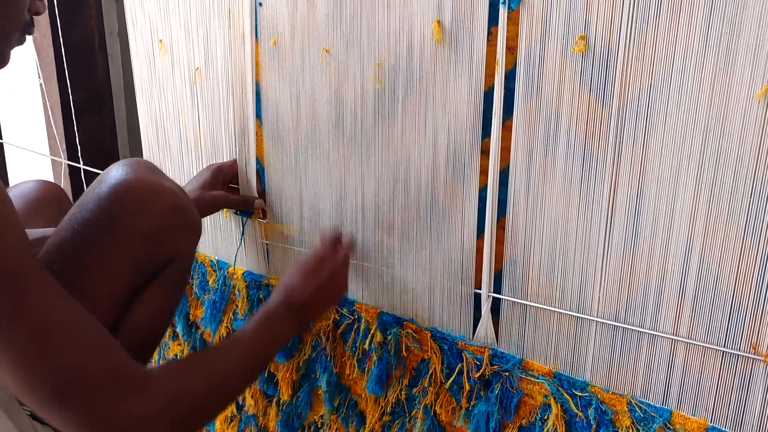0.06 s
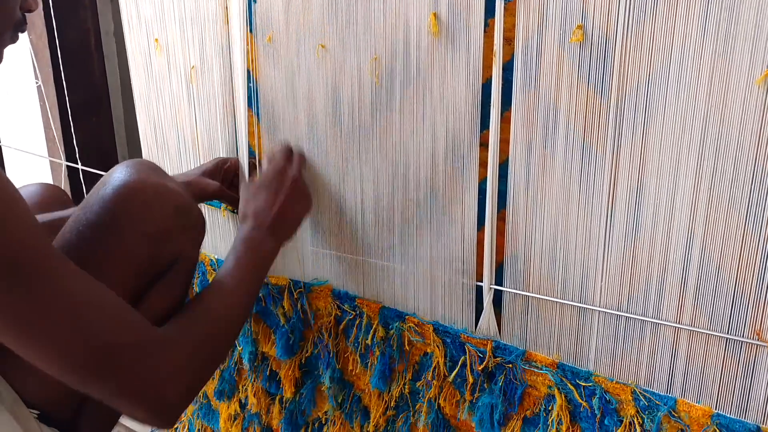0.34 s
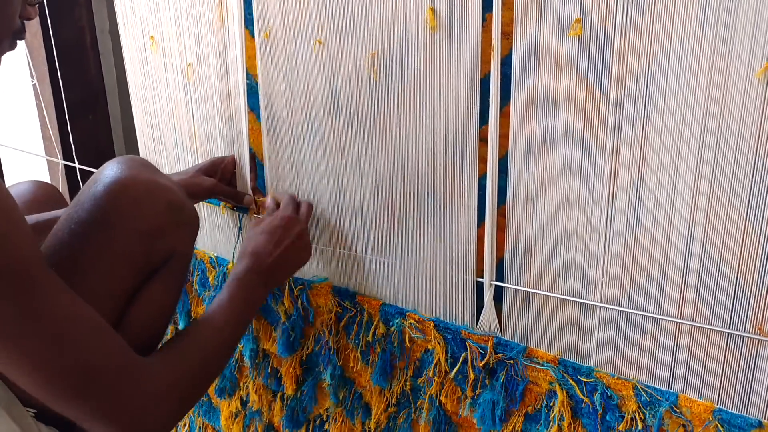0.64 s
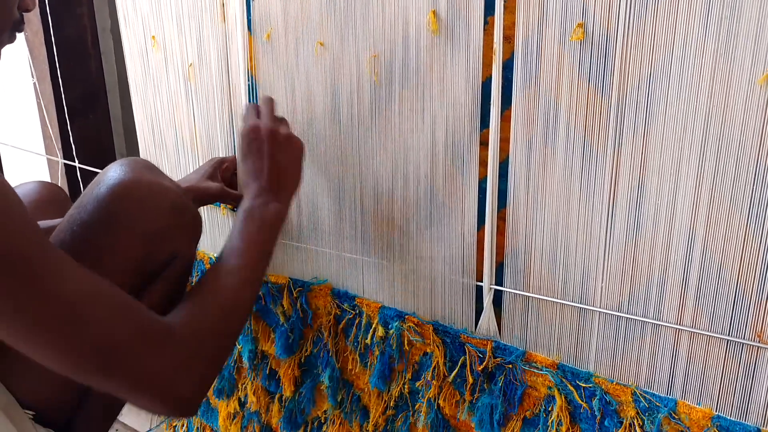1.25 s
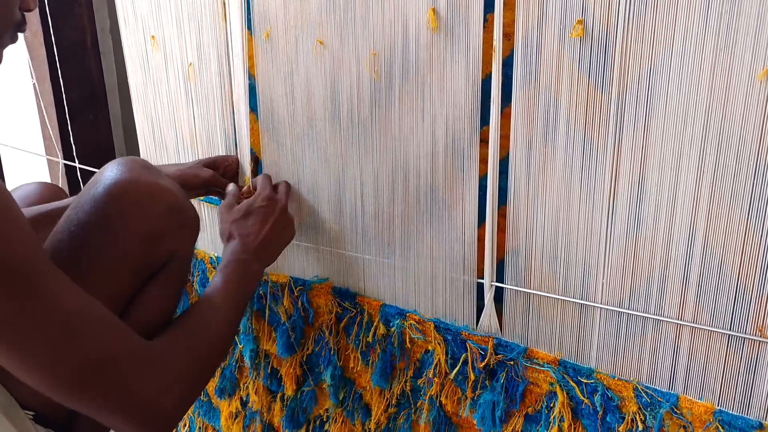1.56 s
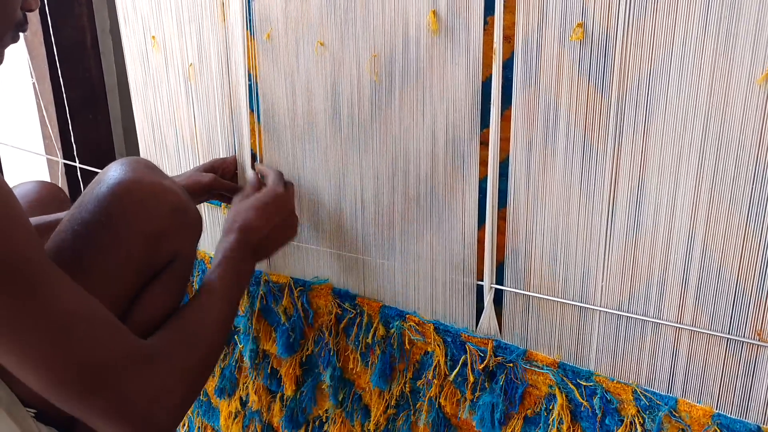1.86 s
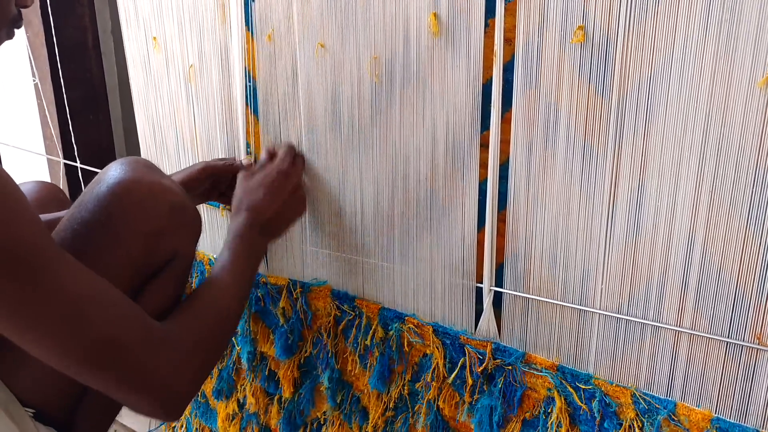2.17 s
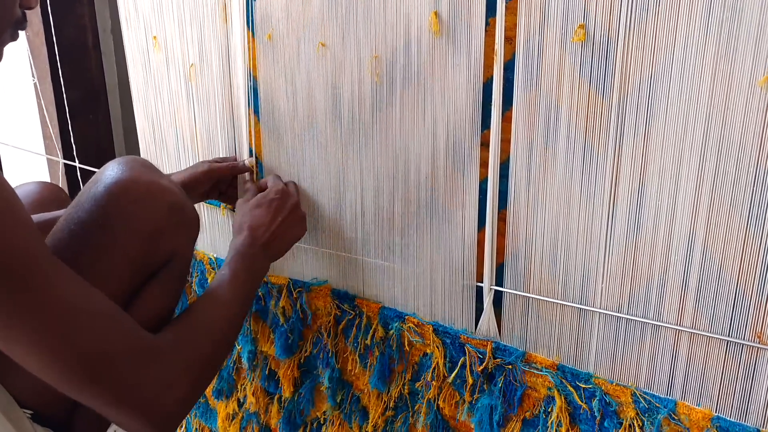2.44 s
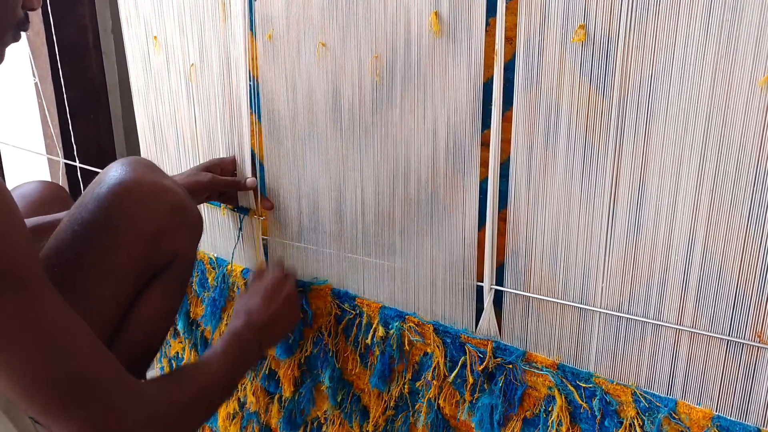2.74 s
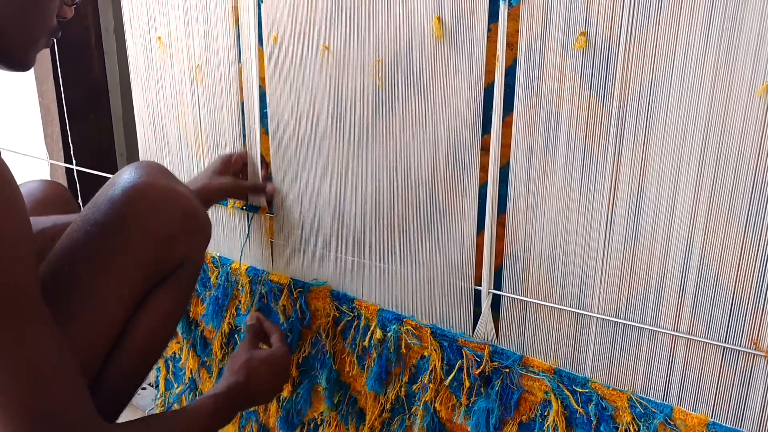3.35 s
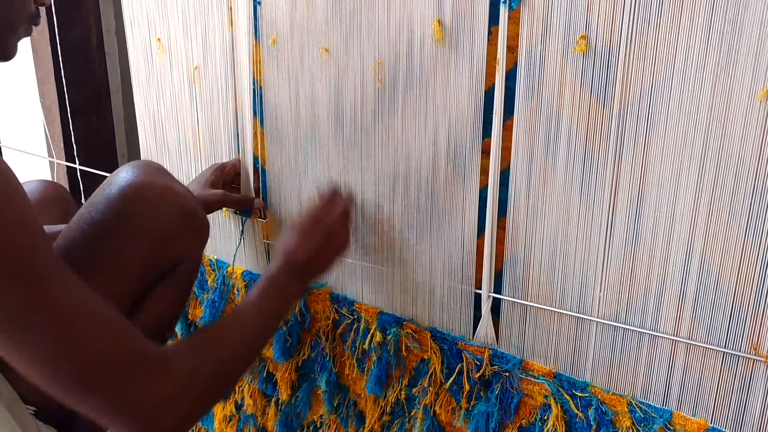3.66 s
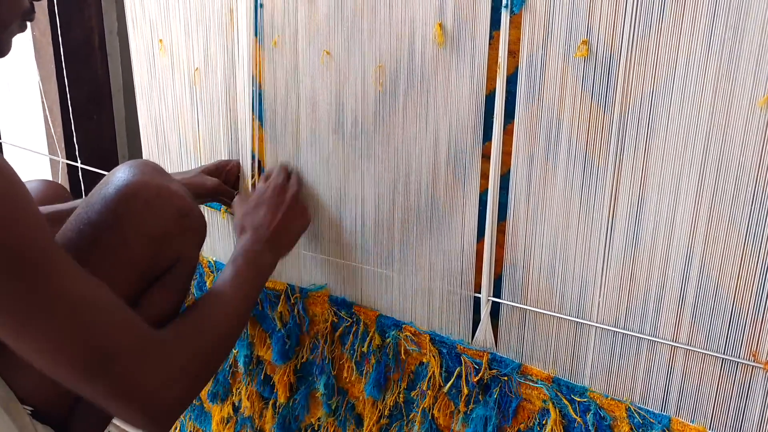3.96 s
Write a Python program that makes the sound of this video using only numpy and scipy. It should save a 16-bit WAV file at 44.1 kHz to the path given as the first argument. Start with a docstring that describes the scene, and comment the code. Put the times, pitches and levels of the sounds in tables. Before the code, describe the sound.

Hand weaving on a carpet loom, with steady low thuds, swishes and humming threads.

```python
"""A bare, quiet room where someone weaves by hand at an upright carpet loom.
About two and a half times a second, with one pause, the hand plucks the warp (the tight upright threads)
with a soft thud that knocks the frame, then rakes across it in a swelling swish; the warp hums on.
Between strokes, yarn rubs and slides and fingers rustle.
Two close microphones hear it all, and their stereo sound is widened."""
import sys
import numpy as np
from scipy import signal
from scipy.fft import rfft, irfft
from scipy.io import wavfile

SR = 44100
rng = np.random.default_rng(int(sys.argv[2]) if len(sys.argv) > 2 else 0)


def int16_out(signal):
    """Quantize to a 16-bit WAV file."""
    q = np.round(np.clip(np.atleast_2d(signal).T, -1, 1) * 32767)
    wavfile.write(sys.argv[1], SR, q.astype(np.int16))


N = 176400
LEAD = 8820  # extra samples before time zero, so a stroke can already be sounding
TIME = (np.arange(N + LEAD) - LEAD) / SR
FREQ = np.fft.rfftfreq(len(TIME), 1 / SR)

# Hand strokes: t/s, thud level/dB, hum level/dB, hum tilt/dB per octave, swish level/dB,
# swish peak delay/s, swish rise/s, fingertip catch level/dB
STROKES = [(-0.02, -27, -22.5, -5.5, -30.5, 0.11, 0.026, -32.5),
           (0.366, -28.5, -22.5, -6, -32.5, 0.11, 0.14, -35.5),
           (0.743, -25, -21.5, -11, -27.5, 0.089, 0.015, -33.5),
           (1.125, -27.5, -21.5, -3.5, -30.5, 0.1, 0.037, -54),
           (1.845, -23, -22.5, -10, -27, 0.12, 0.037, -32),
           (2.283, -25, -22.5, -1, -26.5, 0.11, 0.025, -35.5), (2.683, -24, -24, 0, -25, 0.11, 0.04, -32.5),
           (3.085, -28, -22, -1, -26, 0.11, 0.036, -64), (3.488, -26, -24.5, 0, -27.5, 0.11, 0.047, -56),
           (3.854, -23.5, -26, 0.5, -26.5, .1, 0.019, -39)]


def thuds(attack_s=0.016, decay_s=0.11):
    """Fingers grip a bunch of threads and let it snap free; each pluck stirs the room differently."""
    # Tone of the thud: f/Hz, level/dB
    spectrum = [(30, -40), (60, -12), (110, -8), (185, 1), (270, -1), (440, 0), (600, -4), (900, -3.5),
                (1500, -16), (3200, -16), (5000, -34.5), (8000, -45), (15000, -51)]
    snaps = colour(thread_clicks(per_second=2000), spectrum)
    out = 0
    for start, db, *_ in STROKES:
        grip = undb(-10) * hump(start, half_s=0.0073)  # a brush just before the pull
        pluck = burst(start, attack_s, decay_s)
        out = out + undb(db) * room((grip + pluck) * snaps, wet_db=-5)
    return out


def frame_knocks(rise_s=0.0043, overtone_ratio=2.225, rebound_s=0.01946, rebound_db=-3):
    """The tugged warp jolts the frame with a short, low knock and a rebound."""
    # Knocks: t/s, level/dB, overtone relative to the low note/dB, f/Hz
    knocks = [(0.009, -21, -15, 143), (0.377, -18, -18, 167), (0.750, -18.5, -2.5, 163),
              (0.821, -22, -8, 171), (1.15, -23, -17, 142), (1.856, -16.5, -1.5, 165.4),
              (1.913, -18.5, -13, 145), (2.292, -17.5, -7, 163), (2.346, -22, -5, 171),
              (2.696, -14.5, -3.5, 177), (2.768, -22, -7, 162), (3.092, -14.5, -8.5, 158),
              (3.497, -16.5, -9, 175), (3.866, -18.5, -11.5, 170)]
    out = np.zeros((2, len(TIME)))
    t = np.arange(SR // 10) / SR
    swell = t / rise_s * np.exp(1 - t / rise_s)
    for start, db, overtone_db, hz in knocks:
        for delay, drop_db in ((0, 0), (rebound_s, rebound_db)):
            low_phase, high_phase = 2 * np.pi * rng.random((2, 2, 1))
            angle = 2 * np.pi * hz * t
            overtone = undb(overtone_db) * np.sin(overtone_ratio * angle + high_phase)
            at = int((start + delay) * SR) + LEAD
            out[:, at:at + len(t)] += undb(db + drop_db) * swell * (np.sin(angle + low_phase) + overtone)
    return room(out, wet_db=-6)


def fingertip_catches(delay_s=0.0039, attack_s=0.0046, decay_s=0.033):
    """Fingertips catch on the threads with a short rasp as each stroke begins."""
    # Tone of the rasp: f/Hz, level/dB
    spectrum = [(500, -25), (1500, -17), (2900, 7), (3600, -1.5), (4500, -3), (7000, -21), (15000, -45)]
    catch = sum(undb(db) * burst(start + delay_s, attack_s, decay_s) for start, *_, db in STROKES)
    return room(colour(catch * thread_clicks(per_second=3000), spectrum), wet_db=-5)


def warp_hum(threads=4, detune=0.02004, attack_s=0.0044, pivot_hz=180):
    """Each stroke sets groups of slightly out-of-tune threads ringing."""
    # Natural notes of the warp and frame: f/Hz, level/dB, time to fade by 60 dB/s
    notes = [(76, -24, 0.6), (100.6, -8, 1.3), (122.2, -7, 0.61), (142.1, -1, 1.63), (160, -13.5, 1.3),
             (172, -1.5, 0.33), (220.4, -0.5, 0.5), (348.5, -10.5, 2.8), (455, 0, 1.26), (628, -10, 1.4),
             (837, -5.5, 1.73), (1435, -28, 0.59)]
    t = np.arange(SR) / SR
    out = np.zeros((2, len(TIME) + SR))
    strength = np.sqrt(threads * sum(undb(db) ** 2 for _, db, _ in notes) / 2)
    for start, _, hum_db, tilt_db, *_ in STROKES:
        ring = 0
        for hz, db, fade_s in notes:
            pitch = hz * (1 + detune * rng.standard_normal((2, threads, 1)))
            cycles = pitch * t + rng.random((2, threads, 1))
            gain = undb(db + tilt_db * np.log2(hz / pivot_hz))
            ring = ring + gain * undb(-60 * t / fade_s) * np.sin(2 * np.pi * cycles).sum(axis=1)
        at = max(int(start * SR) + LEAD, 0)
        out[:, at:at + SR] += undb(hum_db) * ring * (1 - np.exp(-t / attack_s)) / strength
    return out[:, :len(TIME)]


def swishes(onset_s=0.044, fall_s=0.023, drag_s=0.069, bright_db=2, bright_hz=7000):
    """The hand rakes the warp, faster and brighter until it leaves the threads; single fibres crackle."""
    # Tone of the swish: f/Hz, level/dB
    swish_spectrum = [(40, -28), (120, 1), (220, -0.5), (500, -4.5), (1000, -6.5), (2000, -11), (3500, -11),
                      (6000, -17.5), (8500, -24), (11000, -31), (13000, -45), (15000, -48)]
    # Narrow resonances of the raked threads: f/Hz, width/Hz, level/dB
    resonances = [(3150, 36, 0), (3320, 31, -5), (6400, 90, -0.5), (6270, 38, 5)]
    # Tone of the crackle: f/Hz, level/dB
    fibre_spectrum = [(3000, -30), (7000, -4), (11000, 0), (13000, -7), (15000, -10)]
    crest = drag = 0
    for start, *_, db, peak_s, rise_s, _ in STROKES:
        past_peak = TIME - start - peak_s
        touch = undb(db) * np.clip((TIME - start) / onset_s, 0, 1)
        crest = crest + touch * np.exp(-np.abs(past_peak) / np.where(past_peak < 0, rise_s, fall_s))
        drag = drag + touch * 0.39 * np.exp(-np.maximum(past_peak, 0) / drag_s)
    slips = thread_clicks(per_second=3000)
    treble = undb(bright_db * FREQ ** 2 / (FREQ ** 2 + bright_hz ** 2))
    raking = treble * rfft(crest * slips) + rfft(drag * slips)
    rasp = irfft(raking * resonance_gain(resonances), len(TIME))
    crackle = undb(-26) * colour(crest * thread_clicks(per_second=260), fibre_spectrum)
    return room(colour(rasp, swish_spectrum), wet_db=-1) + room(crackle, wet_db=-12)


def yarn_rubs():
    """Yarn rubs with a soft, low scuff between strokes."""
    # Rubs: middle t/s, half length/s, level/dB
    rubs = [(0.246, 0.25, -36.5), (0.528, 0.048, -34), (0.834, 0.02, -35), (1.285, 0.11, -33.5),
            (2.094, 0.21, -33), (2.504, 0.17, -34), (2.887, 0.064, -28), (3.032, 0.061, -32),
            (3.3, 0.13, -32), (3.665, 0.049, -30)]
    # Tone of the rubbing: f/Hz, level/dB
    spectrum = [(50, -37), (150, 4.5), (450, 3), (800, -3), (1600, -7), (2300, -11.5), (4000, -19),
                (7000, -28), (15000, -50)]
    return friction(rubs, spectrum, per_second=1400, wet_db=0.5)


def yarn_slides():
    """Yarn hisses as it slides through the warp."""
    # Slides: middle t/s, half length/s, level/dB
    slides = [(0.12, 0.14, -42.5), (0.31, 0.073, -38), (1.06, 0.17, -39.5), (1.83, 0.048, -40.5),
              (2.18, 0.15, -40.5), (2.96, 0.17, -35.5)]
    # Tone of the sliding: f/Hz, level/dB
    spectrum = [(500, -40), (1100, -7.5), (1500, -1.5), (1900, -1.5), (2400, -16), (3500, -40), (7000, -34),
                (15000, -55)]
    return friction(slides, spectrum, per_second=1500, wet_db=-1)


def finger_rustles():
    """Fingers pick at the warp with a light rustle."""
    # Rustles: middle t/s, half length/s, level/dB
    rustles = [(0.22, 0.034, -47), (0.71, 0.02, -42), (1.33, 0.048, -54), (1.64, 0.073, -48),
               (1.77, 0.05, -51), (2.2, 0.055, -47.5), (3.76, 0.025, -43.5)]
    # Tone of the picking: f/Hz, level/dB
    spectrum = [(300, -25), (1000, -12), (1700, 4), (3800, 1.5), (5500, -13), (9000, -10), (12000, -14),
                (15000, -20)]
    return friction(rustles, spectrum, per_second=500, wet_db=4.5)


def ticks(decay_s=0.0013):
    """Tiny bright ticks, too close to the microphones to stir the room."""
    # Ticks: t/s, level/dB
    events = [(3.873, -37), (3.877, -37)]
    loudness = sum(undb(db) * burst(start, decay_s / 2, decay_s) for start, db in events)
    return loudness * rng.standard_normal((2, len(TIME)))


def room_tone(level_db=-31, points=40):
    """The low, gently wavering background of the workroom."""
    # Tone of the background: f/Hz, level/dB
    spectrum = [(25, -23), (50, -17.5), (75, 2), (110, 4.5), (150, 0.5), (250, -6.5), (450, -10.5),
                (1000, -17.5), (2000, -23), (4000, -26), (6000, -35.5), (8000, -42), (11000, -44.5),
                (15000, -62)]
    waver_db = np.interp(TIME, np.linspace(TIME[0], TIME[-1], points), rng.standard_normal(points))
    return undb(level_db + waver_db) * colour(rng.standard_normal((2, len(TIME))), spectrum)


def room(x, wet_db, build_s=0.00047):
    """Add the room's echo, whose treble dies first; wet_db is its level against the direct sound."""
    # Length of the echo: f/Hz, time to fade by 60 dB/s
    fade_times = [(100, 1), (500, 0.99), (2000, 1), (5000, 0.76), (12000, 0.45)]
    hz, t, noise = signal.stft(rng.standard_normal((2, SR)), SR, nperseg=256)
    fade_s = look_up(hz, fade_times)[:, None]
    tail = signal.istft(noise * undb(-60 * t / fade_s), SR)[1]
    tail *= np.clip(np.arange(tail.shape[1]) / SR / build_s, 0, 1)
    tail *= undb(wet_db) / np.sqrt(np.sum(tail ** 2, axis=1, keepdims=True))
    echo = signal.fftconvolve(x, tail, axes=1)[:, :len(TIME)]
    return (x + echo) / np.sqrt(1 + undb(wet_db) ** 2)


def friction(moves, spectrum, per_second, wet_db):
    """Many tiny slips blend into a brushing sound that swells and fades with each move."""
    pull = sum(undb(db) * hump(middle, half_s) for middle, half_s, db in moves)
    return room(colour(pull * thread_clicks(per_second), spectrum), wet_db)


def thread_clicks(per_second, spread_db=3):
    """Threads slip one by one: random clicks of uneven size in two channels, with average power 1."""
    shape = (2, len(TIME))
    slips = rng.random(shape) < per_second / SR
    clicks = slips * np.sign(rng.standard_normal(shape))
    clicks *= undb(spread_db * rng.standard_normal(shape))
    return clicks / clicks.std()


def burst(start, attack_s, decay_s):
    """A loudness curve that rises in a straight line, then dies away."""
    age = TIME - start
    return np.clip(age / attack_s, 0, 1) * np.exp(-np.maximum(age - attack_s, 0) / decay_s)


def hump(middle, half_s):
    """A smooth, bell-shaped loudness curve."""
    return np.exp(-((TIME - middle) / half_s) ** 2)


def colour(x, spectrum):
    """Give a sound its tone; white noise keeps its overall power."""
    gain = undb(look_up(FREQ, spectrum))
    return irfft(rfft(x) * gain / np.sqrt(np.mean(gain ** 2)), len(TIME))


def resonance_gain(table):
    """Gain at each frequency for a few narrow peaks and dips."""
    return undb(sum(db * np.exp(-((FREQ - hz) / width) ** 2) for hz, width, db in table))


def look_up(hz, table, column=1):
    """Read between a table's rows, giving every octave equal space."""
    rows = np.array(table, float)
    return np.interp(np.log(np.maximum(hz, 1)), np.log(rows[:, 0]), rows[:, column])


def undb(db):
    """Turn decibels into a multiplier."""
    return 10 ** (np.asarray(db) / 20)


def scene():
    """Loom and room in two channels that share their timing but each have their own noise."""
    strokes = thuds() + frame_knocks() + fingertip_catches() + warp_hum() + swishes()
    return (strokes + yarn_rubs() + yarn_slides() + finger_rustles() + ticks() + room_tone())[:, LEAD:]


def record(dry, notch_shape=1.3, top_hz=15500):
    """The microphones colour the sound; the stereo is widened and the highest treble is cut."""
    # Resonances of the microphone openings: f/Hz, width/Hz, level/dB
    ports = [(1890, 84, 2), (2442, 113, -18), (2600, 28, 11), (4736, 110, 8), (7740, 290, 6)]
    # Notches where side (left minus right) and mid (their sum) cancel by turns: f/Hz, leak level/dB
    notches = [(1250, -25), (2425, -90), (3700, -8), (5000, -8.5), (6300, -2.5), (7600, -15), (8920, -42),
               (9980, -42), (11250, -30), (12500, -18), (13800, 2), (15200, -11)]
    # Stereo spread: f/Hz, side level/dB, likeness of side and mid/0-1, side phase lead/rad
    image = [(45, -17, 0.9, 2.1), (115, -14.5, 0.87, 1.13), (185, -16.5, 0.92, 0.86),
             (277, -13, 0.78, 0.84), (450, -9.5, 1, 0.79), (785, -2, 0.62, 0.65), (1310, 3.5, 0.3, 1.3),
             (2060, -2.5, 0.06, -0.077), (3170, 1.5, .45, -1.6), (4320, -4, 0, -1.5), (4600, 3, 0.27, 1.2),
             (5570, -2, 0.7, -1.4), (6660, -1, 0.5, 1.1), (8900, -8, 0.65, -1.6), (9700, 7.5, 0, 1),
             (12500, -3, 0.5, 0.14)]
    mid, unrelated = rfft(dry, len(TIME)) * resonance_gain(ports)
    angle = np.pi / 2 * np.interp(FREQ, [0] + [hz for hz, _ in notches], np.arange(len(notches) + 1))
    leak = undb(look_up(FREQ, notches))
    side_gain = np.hypot(np.abs(np.cos(angle)) ** notch_shape, leak)
    mid_gain = np.hypot(np.abs(np.sin(angle)) ** notch_shape, leak)
    width = side_gain / mid_gain * undb(look_up(FREQ, image))
    alike = np.clip(look_up(FREQ, image, column=2), 0, 1)
    phase_lead = np.exp(1j * look_up(FREQ, image, column=3))
    side = width * (alike * phase_lead * mid + np.sqrt(1 - alike ** 2) * unrelated)
    pair = irfft(np.array([mid + side, mid - side]) / np.hypot(1, width), len(TIME))[:, :N]
    return signal.sosfilt(signal.ellip(10, .2, 80, top_hz, fs=SR, output="sos"), pair)


dry = scene()
out = record(dry)
int16_out(out)
```